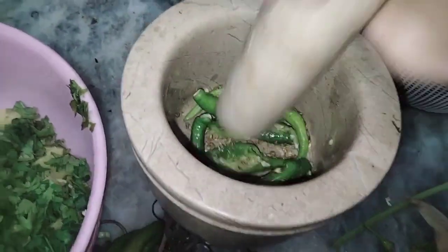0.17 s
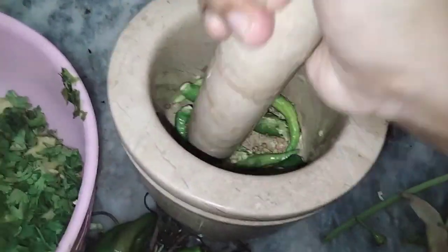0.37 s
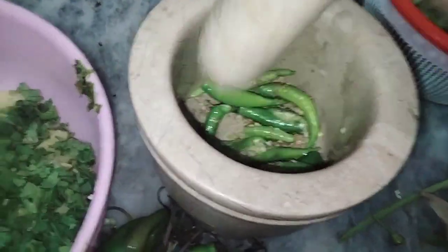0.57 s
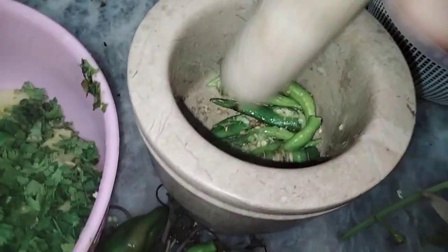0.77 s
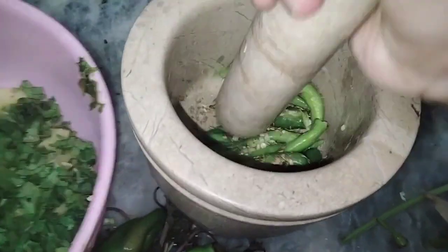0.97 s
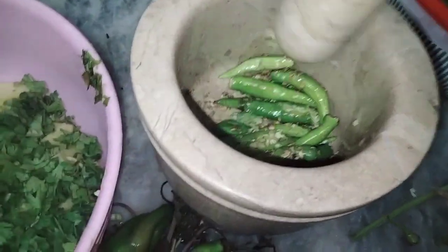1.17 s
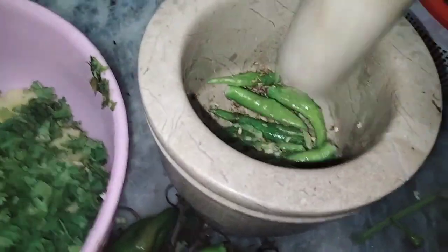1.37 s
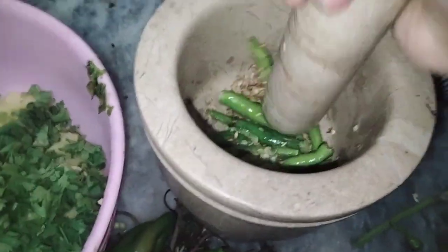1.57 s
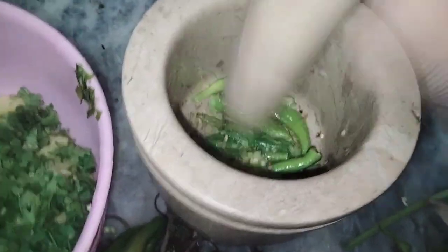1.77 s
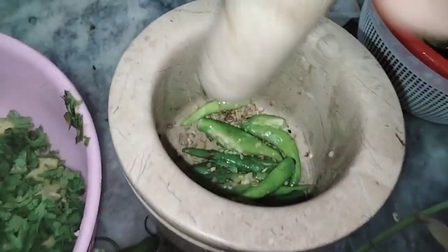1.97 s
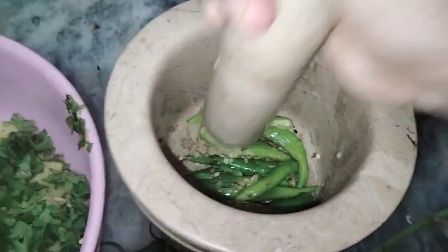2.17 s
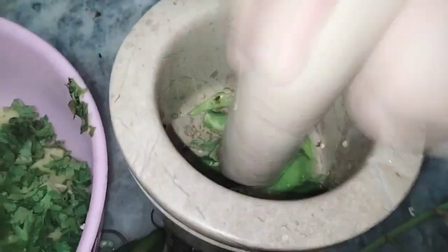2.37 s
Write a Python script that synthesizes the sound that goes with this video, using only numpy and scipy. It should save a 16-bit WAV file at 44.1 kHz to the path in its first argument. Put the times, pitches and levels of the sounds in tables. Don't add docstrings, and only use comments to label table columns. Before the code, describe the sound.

Close, bright phone pickup of regular mortar pounding: chilli skins burst, seeds snap on stone, low thumps follow. Tiny wet ticks between blows, an early hollow pot knock, a later spoon clink, faint birds and fridge hum.

```python
import sys
import numpy as np
from scipy import signal
from scipy.fft import rfft, irfft
from scipy.io import wavfile
from scipy.ndimage import map_coordinates

SR = 44100
rng = np.random.default_rng(int(sys.argv[2]) if len(sys.argv) > 2 else 0)


def put_to_file(sound):
    columns = np.atleast_2d(sound).T
    safe = np.clip(columns, -1, 1)
    whole_steps = np.round(safe * 32767)
    wavfile.write(sys.argv[1], SR, whole_steps.astype(np.int16))


def ratio(d):
    e = np.asarray(d, float) / 20
    return 10 ** e


N = 110250
LEAD_S = 0.1
NEAR_WET_DB, FAR_WET_DB = -11.5, 2

# (frequency [Hz], level [dB])
BRIGHT_SPECTRUM = [(2000, -28), (3500, -18.5), (6000, -7), (8000, -1), (10000, -5), (12500, -5.5),
                   (15000, -3.5), (17000, -4)]


def unit(x):
    return x / np.sqrt(np.mean(x ** 2) + 1e-20)


def along(points, hz):
    f, v = np.transpose(points)
    return np.interp(np.log(hz + 1), np.log(f + 1), v)


def colour(x, points):
    gain = ratio(along(points, np.fft.rfftfreq(4096, 1 / SR)))
    cepstrum = irfft(np.log(gain + 1e-4))
    cepstrum[1:2048] *= 2
    response = irfft(np.exp(rfft(cepstrum[:2049], 4096)))
    return signal.fftconvolve(x, response / np.linalg.norm(response))[:len(x)]


def wobble(rate):
    knots = rng.standard_normal(int(N * rate / SR) + 4)
    return map_coordinates(knots, [np.arange(N) * rate / SR])


def ring(modes, t, rise_s, scatter_db):
    total = 0
    for k, (hz, db, t60) in enumerate(modes):
        decay = ratio(db + scatter_db * rng.normal() - 60 * t / t60)
        total = total + (-1) ** k * decay * np.sin(2 * np.pi * hz * t)
    return total * (1 - np.exp(-t / max(rise_s, 1e-5)))


def add(track, s, x, wet_db, send=None):
    # (frequency [Hz], t60 [s])
    room_decay = [(100, 1), (800, 0.62), (2500, 0.63), (8000, 0.41), (15000, 0.31)]
    rise_s, echo_s, echo_spread_s, echo_lift = 0.0044, 0.03, 0.011, 0.4
    hz, t, z = signal.stft(rng.standard_normal(SR * 2 // 3), SR, nperseg=256)
    swell = 1 - np.exp(-(t / rise_s) ** 2)
    echoes = echo_lift * np.exp(-((t - echo_s) / echo_spread_s) ** 2)
    decay = ratio(-60 * t / along(room_decay, hz)[:, None])
    tail = signal.istft(z * decay * (swell + echoes), SR, nperseg=256)[1]
    placed = signal.fftconvolve(x if send is None else send, ratio(wet_db) * tail / np.linalg.norm(tail))
    placed[:len(x)] += x
    part = track[round((s + LEAD_S) * SR):][:len(placed)]
    part += placed[:len(part)]


def air():
    # (frequency [Hz], level [dB])
    tone_spectrum = [(150, 4), (300, -7.5), (400, -3), (550, -16), (850, -8), (1200, -23), (4000, -26.5),
                     (16000, -46.5)]
    # (frequency [Hz], level [dB])
    rumble_spectrum = [(10, 28), (30, 3.5), (60, -8.5), (150, -10), (300, -36)]
    air_db, rumble_db, hum_db, hum_hz, hum_width_hz = -55, -51, -60, 127.3, 15.3
    f = np.fft.rfftfreq(N, 1 / SR)

    def noise(gain):
        return unit(irfft(rfft(rng.standard_normal(N)) * gain, N))

    tone = ratio(air_db + wobble(3.4)) * noise(ratio(along(tone_spectrum, f)) * (f > 70))
    hum = ratio(hum_db + 0.34 * wobble(3.5)) * noise(1 / (1 + ((f - hum_hz) / hum_width_hz) ** 2))
    rumble = ratio(rumble_db + 1.3 * wobble(4.0)) * noise(ratio(along(rumble_spectrum, f)) * (f > 12))
    return tone + hum + rumble


def struck(hits, modes, spectrum, wet_db, scatter_db, free_s):
    rattle, rattle_s = 0.32, 0.0043
    track, t = np.zeros(N + SR), np.arange(SR // 4) / SR
    free = np.clip((free_s - t) / 0.003, 0, 1)
    for s, ring_db, crack_db, tilt in hits:
        click = (t == 0) + rattle * rng.standard_normal(len(t)) * np.exp(-t / rattle_s)
        clean_click = np.linalg.norm(click) * (t == 0)
        tilted = [(hz, db + 2 * tilt * np.log2(max(hz, 900) / 900)) for hz, db in spectrum]
        body = ratio(ring_db) * ring(modes, t, 0.00034, scatter_db) * free
        near, send = [body + ratio(crack_db) * colour(x, tilted) for x in (click, clean_click)]
        add(track, s, near, wet_db, send)
    return track


def pot_knocks():
    # (time [s], ring level [dB], crack level [dB], treble tilt [steps of 2 dB per octave])
    knocks = [
        (-.09, -38.5, -41, -3),
        (.196, -39.5, -65, -4),
        (.2112, -15.5, -15, 4.5),
        (.5475, -27, -43.5, -2),
        (.63, -52, -36, -4),
        (1.96, -35.5, -57, 0),
        (2.045, -35.5, -53, -0.5),
        (2.24, -50.5, -44.5, 2.5),
    ]
    # (frequency [Hz], level [dB], t60 [s])
    pot_modes = [(396.4, -10.5, 0.051), (668, -11, 0.051), (750, -3.5, 0.014), (857.2, 1, 0.035),
                 (1185, -13, 0.017), (1240, -12, 0.023), (1578, -12, 0.019), (1616, -15, 0.022),
                 (2050, -23.5, 0.028)]
    # (frequency [Hz], level [dB])
    crack_spectrum = [(150, -11.5), (350, 4), (900, 15.5), (1550, 6), (2200, 0.5), (3200, -15), (6000, -28),
                      (16000, -56)]
    return struck(knocks, pot_modes, crack_spectrum, FAR_WET_DB, scatter_db=1, free_s=1)


def crackle(shape):
    grains_per_s, grain_scatter_db, fizz = 5000, 3, 0.3
    n = len(shape)
    clicks = (rng.random(n) < grains_per_s / SR) * ratio(grain_scatter_db * rng.standard_normal(n))
    burst = (clicks * rng.choice([-1, 1], n) + fizz * rng.standard_normal(n)) * shape
    size = np.linalg.norm(shape)
    return burst * size / np.linalg.norm(burst), size * (np.arange(n) == np.argmax(shape))


def crunch():
    # (time of peak [s], bright level [dB], dull level [dB], fall [s], treble tilt [steps of 2 dB per
    bursts = [(-.08, -16.5, -31.5, 0.0019, 0), (0.2081, -25.5, -30.5, 0.003, -4.5),
              (0.4988, -36, -41, 0.0045, -3), (0.5089, -31.5, -30, 0.003, 2),
              (0.513, -27, -40, 0.0026, -2.5), (.794, -23.5, -46, 0.004, 5), (0.7988, -24, -47, 0.0028, 2),
              (1.084, -26.5, -42, 0.0022, -0.5), (1.3646, -34.5, -40, .001, -3.5),
              (1.3686, -21, -32.5, 0.0023, 1), (1.665, -22.5, -43.5, 0.0044, 4.5),
              (1.6684, -25.5, -39, 0.0024, -1.5), (1.67, -27.5, -41, 0.0017, -5),
              (1.947, -21.5, -38, 0.0026, -2), (2.046, -48, -56, 0.07, -2), (2.234, -22, -40, 0.0042, 6)]
    # (time of first touch [s], length [s],
    # bright level [dB], dull level [dB])
    squeezes = [(0.201, 0.011, -50, -43.5), (.495, 0.02, -37.5, -73), (0.784, 0.0087, -42.5, -50.5),
                (1.0705, 0.017, -41, -46), (1.359, 0.011, -40.5, -49.5), (1.676, 0.0051, -65.5, -63),
                (1.942, 0.0055, -48, -55), (2.221, 0.011, -51, -60)]
    # (frequency [Hz], level [dB])
    dull_spectrum = [(200, -28), (700, -21.5), (1500, -6.5), (2300, -3), (4000, 1.5), (6000, -28.5),
                     (9000, -51.5)]
    rise_s, swell_db = 0.00049, 20.5
    track, t = np.zeros(N + SR), np.arange(-SR // 100, SR // 5) / SR
    shapes = []
    for s, bright_db, dull_db, fall_s, tilt in bursts:
        shape = np.exp(np.where(t < 0, t / rise_s, -t / max(fall_s, 1e-4)))
        shapes.append((s, bright_db, dull_db, shape, tilt))
    for s, length, bright_db, dull_db in squeezes:
        shape = ratio(swell_db * (t / length - 0.5)) * (t > 0) * (t < length)
        shapes.append((s, bright_db, dull_db, shape, 0))
    for s, bright_db, dull_db, shape, tilt in shapes:
        bright = [(hz, db + 2 * tilt * np.log2(hz / 9000)) for hz, db in BRIGHT_SPECTRUM]
        near, send = [ratio(bright_db) * colour(x, bright) + ratio(dull_db) * colour(x, dull_spectrum)
                      for x in crackle(shape)]
        add(track, s + t[0], near, NEAR_WET_DB, send)
    return track


def ticks():
    # (time [s], level [dB], frequency [Hz], length [cycles])
    wet_ticks = [(.0795, -42, 14600, 8.5), (.3675, -42, 14600, 17), (.7645, -48, 14800, 8.7),
                 (.948, -42.5, 14600, 8), (1.04, -49.5, 9000, 3.9), (1.347, -62, 14500, 10),
                 (1.59, -47, 7650, 3.5), (1.614, -74, 13500, 8), (1.824, -46, 14000, 11),
                 (2.446, -51, 7300, 2.9), (2.479, -61, 6400, 5.1)]
    track, t = np.zeros(N + SR), np.arange(-SR // 200, SR // 200) / SR
    for s, db, hz, cycles in wet_ticks:
        bell = np.exp(-(t * hz / cycles * 2) ** 2)
        add(track, s + t[0], ratio(db) * bell * np.cos(2 * np.pi * hz * t), -9)
    return track


def birds():
    # (start [s], length [s], level [dB], start frequency [Hz], end frequency [Hz])
    whistles = [(0.106, 0.14, -75, 3750, 3770), (.73, 0.058, -69, 3790, 3800),
                (0.873, 0.034, -66, 3680, 3930), (0.947, 0.038, -70.5, 3640, 3830),
                (0.915, 0.04, -74.5, 2700, 2760), (1.022, 0.037, -70, 2730, 2690),
                (1.115, 0.022, -58.5, 3640, 3580), (1.16, 0.04, -67, 2750, 2860),
                (1.583, 0.065, -75, 5090, 5220), (1.775, .045, -72, 3780, 3840),
                (1.83, 0.04, -74.5, 3000, 3140), (.58, 0.023, -65, 3900, 3810),
                (1.565, .04, -72.5, 3950, 3960), (1.852, 0.046, -75, 3900, 4060)]
    track = np.zeros(N + SR)
    for s, length, db, start_hz, end_hz in whistles:
        n = round(length * SR)
        u = np.arange(n) / n
        hz = start_hz + (end_hz - start_hz) * u + 30 * wobble(56)[:n]
        swell = ratio(db - 0.5 + 7.1 * wobble(52)[:n]) * np.sqrt(np.sin(np.pi * u))
        add(track, s, swell * np.sin(2 * np.pi * np.cumsum(hz) / SR), -4)
    return track


def snaps():
    # (time [s], crack level [dB], ring level [dB], ring frequency [Hz])
    seeds = [(.2097, -14, -15, 3250), (.2106, -22, -3, 2250), (.2119, -19, -18, 2500),
             (.5005, -20, -30, 2600), (.5026, -24, -36, 4000), (.5048, -24, -36, 3000),
             (.5083, -17, -27, 3970), (.5098, -17, -33, 4600), (.5117, -14, -22, 3970),
             (.5155, -16, -36, 6400), (.5194, -25, -42, 4000), (.7935, -18, -35, 4110),
             (.7944, -12, -33, 4110), (.7955, -12, -36, 2400), (.7963, -15, -42, 4900),
             (.7981, -15, -36, 4900), (.799, -16, -42, 4100), (1.0725, -42, -37, 2490),
             (1.0785, -34, -35, 2600), (1.0813, -19, -34, 3600), (1.0827, -19, -34, 2030),
             (1.0839, -7, -22, 2490), (1.0852, -10, -26, 5450), (1.0862, -14, -28, 2030),
             (1.0884, -21, -32, 3600), (1.0905, -14, -36, 2500), (1.3657, -17, -31, 3630),
             (1.3676, -6, -25, 5400), (1.3684, -13, -27, 2150), (1.3696, -19, -34, 4800),
             (1.6636, -16, -32, 1950), (1.6658, -19, -31, 4900), (1.6683, -16, -29, 5770),
             (1.6697, -14, -28, 2700), (1.6721, -22, -40, 4090), (1.9456, -17, -29, 4000),
             (1.947, -8, -28, 1800), (1.9496, -16, -33, 5000), (2.2215, -40, -41, 2200),
             (2.2318, -26, -36, 2120), (2.2338, -17, -33, 4870), (2.2351, -18, -32, 5740)]
    snap_s, rattle, stone_t60_s = 0.0004, 0.2, 0.012
    snap_db, ping_db = 5, -4.5
    track, t = np.zeros(N + SR), np.arange(SR // 30) / SR
    for s, crack_db, ring_db, hz in seeds:
        click = (t == 0) + rattle * rng.standard_normal(len(t)) * np.exp(-t / snap_s)
        crack = ratio(crack_db + snap_db) * colour(click / np.linalg.norm(click), BRIGHT_SPECTRUM)
        ping = ring([(hz, ring_db + ping_db, stone_t60_s)], t, 0.0001, 0)
        add(track, s, crack + ping, NEAR_WET_DB, crack + ping / 2)
    return track


def blows():
    # (time [s], bowl ring level [dB], floor thump level [dB])
    pounds = [
        (0.213, -21.5, -24.5),
        (0.51, -40, -31.5),
        (.796, -48.5, -27.5),
        (1.083, -38, -28.5),
        (1.368, -42, -30),
        (1.666, -36.5, -27.5),
        (1.951, -70, -48),
        (2.234, -49, -23),
    ]
    # (frequency [Hz], level [dB], t60 [s])
    bowl_modes = [(889, 10.5, 0.029), (2057, 5, 0.034), (2540, -3, 0.022), (3860, -5.5, 0.024)]
    # (frequency [Hz], level [dB], t60 [s])
    floor_modes = [(37.3, 0.5, 0.071), (126.9, -15, 0.14), (206.4, -13, 0.062)]
    # (frequency [Hz], level [dB])
    thud_spectrum = [(100, 0), (300, 2), (900, -5), (1800, -24.5)]
    track, t = np.zeros(N + SR), np.arange(SR // 4) / SR
    thud = ratio(6) * colour(1.0 * (t == 0), thud_spectrum)
    for s, bowl_db, thump_db in pounds:
        bowl = ratio(bowl_db) * ring(bowl_modes, t, 0.0019, 0.67)
        thump = ratio(thump_db) * ring(floor_modes, t, 0.0023, 1)
        add(track, s, bowl + thump, NEAR_WET_DB)
        add(track, s, ratio(thump_db) * thud, FAR_WET_DB)
    return track


def spoon_clinks():
    # (time [s], ring level [dB], crack level [dB], treble tilt [steps of 2 dB per octave])
    clinks = [
        (1.0555, -59, -49, 0),
        (1.8905, -31.5, -21, 0),
        (2.045, -54, -52, 0),
    ]
    # (frequency [Hz], level [dB], t60 [s])
    spoon_modes = [(1750, 4, .01), (2450, 4, .02), (4439, -6, .4), (4400, -5, .04), (4452, 6, .13),
                   (7850, -9, .04), (10470, -15, .07)]
    # (frequency [Hz], level [dB])
    chink_spectrum = [(250, 3), (450, 9.5), (1800, 5), (5200, 7.5), (6200, -34), (8000, 5), (16000, -30)]
    return struck(clinks, spoon_modes, chink_spectrum, wet_db=-13, scatter_db=0, free_s=0.05)


def scene():
    events = pot_knocks() + crunch() + ticks() + birds() + snaps() + blows() + spoon_clinks()
    return (events[round(LEAD_S * SR):][:N] + air())[None]


def low_pass(x):
    return signal.sosfilt(signal.butter(12, 16650, fs=SR, output="sos"), x)


def record(dry):
    # (frequency [Hz], level [dB])
    mic_response = [(20, 0), (5500, 0.5), (7500, 2), (8800, 9.5), (10300, 4.5), (12000, -0.5), (15500, -3),
                    (15800, -27)]
    top_hz = 16600
    f = np.fft.rfftfreq(N, 1 / SR)
    heard = ratio(1.1) * colour(dry[0], mic_response)[None]
    mix = irfft(rfft(heard) * (f < top_hz), N)
    return low_pass(mix)


dry = scene()
out = record(dry)
put_to_file(out)
```